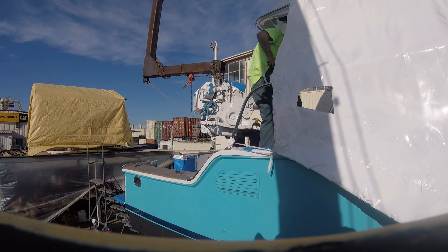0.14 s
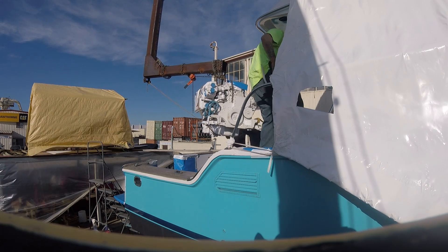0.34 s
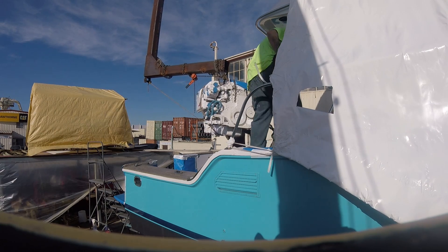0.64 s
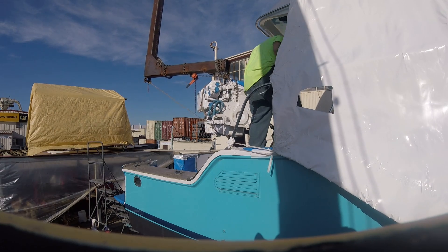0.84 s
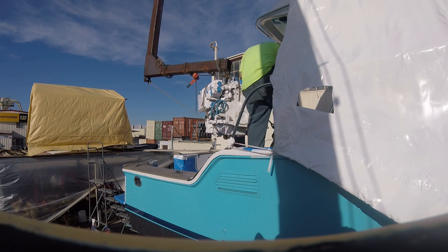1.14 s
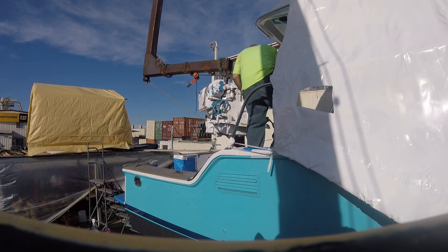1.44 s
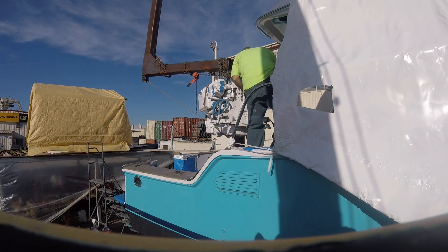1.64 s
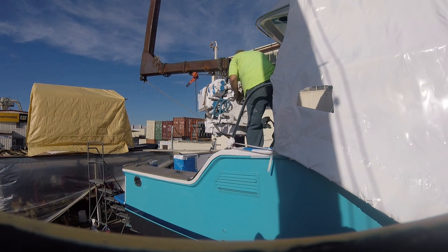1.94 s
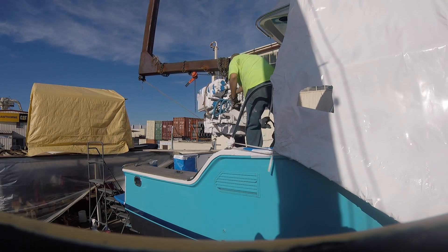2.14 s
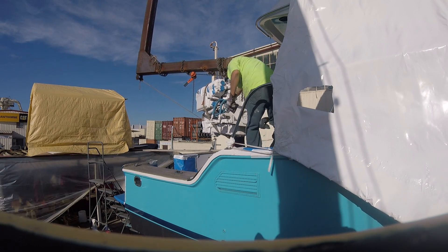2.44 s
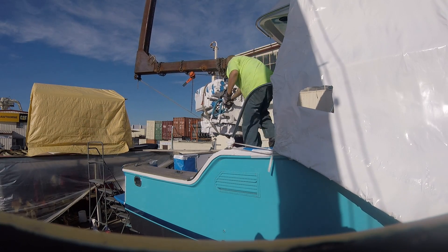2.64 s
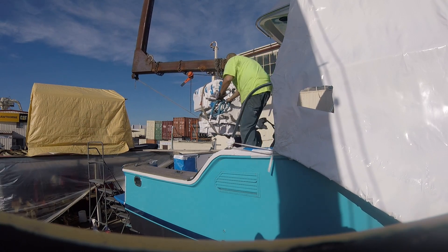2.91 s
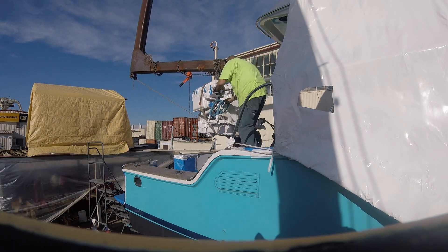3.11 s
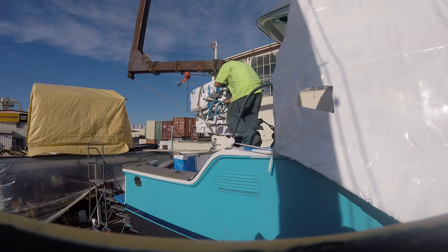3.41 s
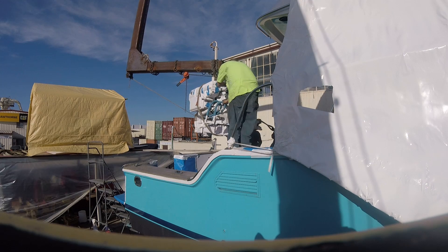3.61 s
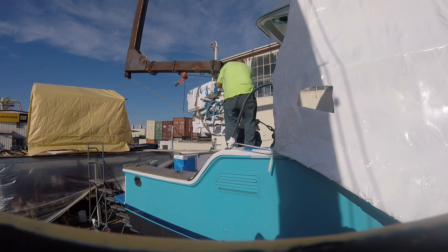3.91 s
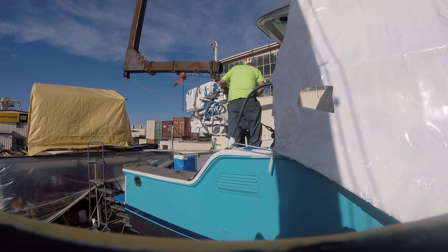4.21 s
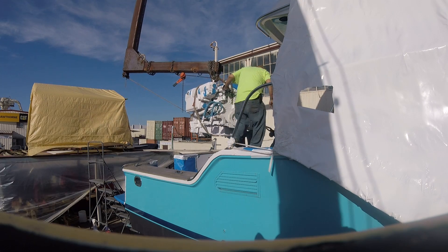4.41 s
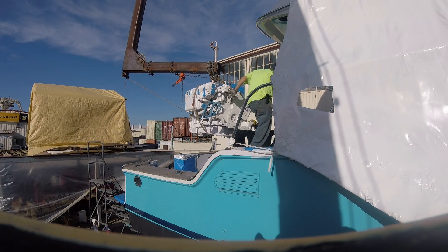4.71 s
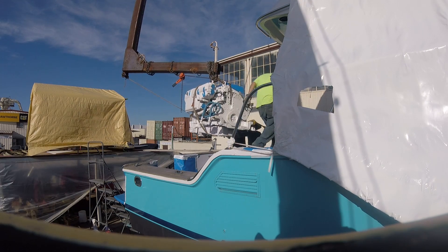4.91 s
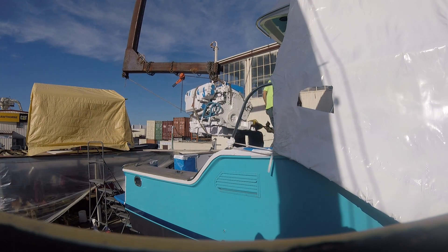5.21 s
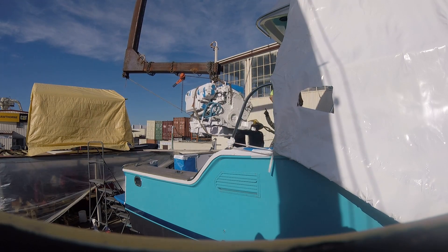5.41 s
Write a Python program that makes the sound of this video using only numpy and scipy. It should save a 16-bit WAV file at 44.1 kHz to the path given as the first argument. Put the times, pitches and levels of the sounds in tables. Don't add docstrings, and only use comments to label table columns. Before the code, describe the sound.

A diesel engine idles with a deep steady rumble in a windy boatyard; metal squeaks, then a hydraulic hiss with ringing pipes begins halfway.

```python
import sys
import numpy as np
from scipy import signal
from scipy.fft import rfft, irfft
from scipy.io import wavfile
from scipy.ndimage import uniform_filter1d

SR = 44100
rng = np.random.default_rng(int(sys.argv[2]) if len(sys.argv) > 2 else 0)


def volts(x):
    e = np.asarray(x, float) / 20
    return 10 ** e


def wrap_up_sound(samples):
    columns = np.atleast_2d(samples).T
    tamed = np.clip(columns, -1, 1)
    steps = np.round(tamed * 32767).astype(np.int16)
    wavfile.write(sys.argv[1], SR, steps)


N = 244755


def read(points, hz):
    f, value = np.transpose(points)
    return np.interp(np.log(hz + 1), np.log(f + 1), value)


def curves(rows):
    s, *columns = np.transpose(rows)
    return [np.interp(np.arange(N) / SR, s, c) for c in columns]


def evened(x):
    return x / np.sqrt(np.mean(x ** 2) + 1e-20)


def steadied(x, seconds):
    width = round(seconds * SR)
    power = uniform_filter1d(uniform_filter1d(x ** 2, width), width)
    return x / np.sqrt(power + 1e-9)


def drift(rate_hz):
    spectrum = rfft(rng.standard_normal(N))
    lowpass = np.exp(-(np.fft.rfftfreq(N, 1 / SR) / rate_hz) ** 2)
    return evened(irfft(spectrum * lowpass, N))


def noise(points, patchy_db):
    hz = np.fft.rfftfreq(2048, 1 / SR)
    real, imaginary, patches = rng.standard_normal((N // 512 + 5, 1025, 3)).T
    patches = uniform_filter1d(patches, size=16, axis=0)
    patches = evened(uniform_filter1d(patches, size=6, axis=1))
    level = volts(read(points, hz)[:, None] + patchy_db * patches)
    spectrum = (real + 1j * imaginary) * level
    return evened(signal.istft(spectrum, nperseg=2048, noverlap=1536)[1][:N])


def resonate(x, hz, width):
    turn = np.exp(2j * np.pi * np.cumsum(hz * np.ones(len(x))) / SR)
    r = np.exp(-np.pi * width / SR)
    return 2 * (turn * signal.lfilter([1 - r], [1, -r], x / turn)).real


def bursts(rows, sharpness):
    out, t = np.zeros(N + SR), np.arange(4000) / SR
    for s, db, hz, length in rows:
        shape = (t / length * 2.35 * np.exp(1 - t / length * 3.96)) ** 2
        width = hz / sharpness
        ringing = resonate(resonate(rng.standard_normal(len(t)), hz, width), hz, width)
        body = shape * ringing
        out[round(s * SR):][:len(t)] += volts(db) * body / abs(body).max()
    return out[:N]


def swell_power(s, length, db):
    return volts(db) ** 2 * np.exp(-8 * ((np.arange(N) / SR - s) / length) ** 2)


def far_motor():
    # t/s, level/dB
    whine = [(0, -44), (.6, -44), (1.2, -55.5), (2.6, -53), (5.55, -72)]
    tone = resonate(resonate(rng.standard_normal(N), 668, 8), 668, 8)
    return volts(curves(whine)[0]) * evened(tone)


def scrapes():
    # t/s, peak level/dB, f/Hz, length/s
    ticks = [
        (.505, -46, 5400, .012),
        (.54, -48, 5400, .012),
        (.83, -50, 7500, .008),
        (.905, -49, 5400, .008),
    ]
    return bursts(ticks, 5.0)


def squeaks():
    # t/s, peak level/dB, f/Hz, length/s
    slips = [
        (0.055, -26, 1450, 0.033),
        (2.395, -33, 1700, 0.086),
        (2.426, -26.5, 1580, 0.043),
        (2.5486, -26.5, 1350, 0.04),
        (2.5994, -29, 1270, 0.026),
    ]
    return bursts(slips, 7.4)


def hum():
    # t/s, upper f/Hz, lower f/Hz
    panel_hz = [(0, 313, 294.3), (.5, 317, 292), (1, 314.2, 296.3), (2, 315, 294), (5.55, 316, 283.9)]
    # middle t/s, length/s, peak level/dB
    upper_swells = [(.42, 0.37, -27.5), (1.05, 0.68, -25.5), (1.75, .2, -23), (2.56, 0.17, -27),
                    (2.86, 0.23, -23), (3.1, 0.17, -26.5), (3.38, 0.46, -28), (3.95, .15, -30),
                    (4.3, .1, -28), (4.7, 0.17, -31.5), (5.1, 0.2, -30), (5.32, 0.51, -27)]
    # middle t/s, length/s, peak level/dB
    lower_swells = [(.18, 0.42, -21), (.55, 0.45, -27), (1.1, 0.19, -31), (1.72, 0.16, -23),
                    (2.04, 0.14, -25.5), (2.72, 0.3, -25.5), (3.18, 0.18, -21.5), (3.39, 0.18, -24),
                    (4.05, .08, -30), (4.65, 0.2, -35), (5.07, 0.16, -24.5), (5.27, 0.15, -29)]
    upper_rest_db, lower_rest_db = -36.5, -38.5
    upper_hz, lower_hz = curves(panel_hz)
    upper_level = np.sqrt(volts(upper_rest_db) ** 2 + sum(swell_power(*row) for row in upper_swells))
    lower_level = np.sqrt(volts(lower_rest_db) ** 2 + sum(swell_power(*row) for row in lower_swells))
    upper = np.sqrt(2) * np.cos(2 * np.pi * np.cumsum(upper_hz + 1.37 * drift(4)) / SR)
    lower = evened(resonate(resonate(rng.standard_normal(N), lower_hz, 21), lower_hz, 14))
    return volts(0.3) * upper_level * upper + volts(-2.0) * lower_level * lower


def wind_db(hz, light_db, slope):
    # t/s, strength level/dB
    breeze = [(0, 6.5), (.25, -6), (1.3, -1), (1.6, 3), (2.05, -2), (2.6, -3.5), (3.0, 7), (3.42, 6.5),
              (3.48, -1.5), (3.7, 1), (3.9, 5.5), (4.25, 9.5), (4.35, 3), (5.05, 0), (5.35, 6), (5.55, 1.5)]
    # middle t/s, length/s, peak level/dB, eddy f/Hz
    gusts = [(0.093, 0.084, -18, 120), (0.892, 0.027, -24, 110), (1.144, 0.058, -23, 180),
             (1.199, 0.033, -19, 85), (1.403, 0.063, -21, 180), (1.45, 0.074, -11, 50),
             (1.566, 0.067, -14, 60.2), (2.217, 0.073, -12.5, 70.4), (2.397, 0.13, -18, 65),
             (2.787, 0.18, -19, 99.7), (3.035, 0.077, -18.5, 80), (3.12, 0.052, -14, 110),
             (3.242, 0.077, -13.5, 126), (3.409, 0.04, -5.5, 86), (3.737, 0.055, -15.5, 105),
             (3.854, 0.025, -7, 100), (3.954, 0.038, -17.5, 85), (3.99, .06, -16, 45),
             (4.059, 0.067, -11.5, 130), (4.16, 0.071, -17, 130), (4.218, 0.039, -10, 98),
             (4.565, 0.18, -20.5, 94), (4.934, 0.072, -15, 112), (5.213, 0.05, -16, 115),
             (5.31, .06, -26, 40.32), (5.37, 0.11, -22, 180), (5.508, .12, -23, 59.9)]
    spread_db = 7
    power = volts(light_db + slope * curves(breeze)[0]) ** 2
    for s, length, db, eddy_hz in gusts:
        octaves = np.log2(hz / eddy_hz)
        power = power + swell_power(s, length, db - spread_db * octaves ** 2)
    return 10 * np.log10(power)


def wind():
    # centre f/Hz, light-breeze level/dB, gain/(dB per dB of strength)
    wind_bands = [(34.6, -31.5, 0.5), (93, -24.5, 0.72), (180, -25, 0.72), (385, -29.5, 0.35)]
    calm_db = [-26, -24, -24, -26]
    # f/Hz, level/dB
    spectra = [[(10, -35.5), (25, 13.5), (45, 12.5), (60, -3.5), (90, -30.0), (400, -110)],
               [(35, -26.5), (70, -2.5), (110, -4.5), (150, -10.5), (220, -39), (700, -110)],
               [(70, -26.0), (130, 2), (180, 4.5), (280, -4.0), (400, -23.0), (1500, -110)],
               [(220, -26.5), (340, 1.5), (600, -8.5), (900, -19.5), (2500, -110)]]
    chop = volts(2.55 * drift(35))
    total = np.zeros(N)
    for band, calm, spectrum in zip(wind_bands, calm_db, spectra):
        db = wind_db(*band)
        db = db - 1.17 * np.maximum(calm - db, 0)
        total += volts(db) * steadied(chop * noise(spectrum, patchy_db=1.4), 0.045)
    return total


def puffs():
    # t/s, peak level/dB, f/Hz, length/s
    buffets = [(1.09, -10, 326, 0.06), (1.1, -32, 410, 0.045), (1.13, -12, 231, 0.055),
               (1.48, -18.5, 313, 0.031), (3.41, -11, 208, 0.019), (3.838, -10.5, 360, 0.012),
               (3.84, -22, 600, 0.032), (4.003, -13.5, 585, 0.015), (4.005, -13.5, 335, 0.041),
               (4.16, -13.5, 348, 0.036), (4.235, -16.5, 594, 0.015)]
    return bursts(buffets, 4.0)


def hydraulics():
    # f/Hz, level/(dB per Hz)
    hiss_spectrum = [(600, -37), (1100, -28.5), (1400, -6), (2000, -13.5), (3300, -17), (4400, -17),
                     (4800, -12.5), (6300, -13.5), (7200, -26.5), (9300, -31), (10900, -31), (12000, -49),
                     (13200, -39.5), (15000, -62.5)]
    # f/Hz, width/Hz, rms level/dB
    pipes = [(1165, 12, -50), (1210, 16, -45), (1234, 12, -42), (1258, 10, -47), (1298, 10, -42),
             (1406, 12, -41), (1465, 12, -40), (1507, 11, -44), (1543, 10, -44), (1598, 11, -47),
             (1669, 14, -46), (1690, 14, -48), (1847, 12, -47), (2172, 20, -53), (2212, 22, -51),
             (2589, 28, -55), (2795, 75, -46), (2952, 20, -52), (3220, 30, -58), (3484, 40, -58),
             (4167, 60, -56), (4657, 25, -57), (4801, 30, -56), (5046, 36, -47), (5181, 25, -57),
             (5630, 35, -54), (5870, 60, -54), (6069, 25, -56), (7565, 40, -67), (9250, 50, -73)]
    # t/s, level/dB
    load = [(2.65, -7), (2.78, 0), (3.06, -1), (3.55, -2), (4.15, -1.7), (4.4, -5), (4.7, -4), (4.8, 0),
            (5.55, -2.5)]
    valve_s, valve_rise_s = 2.651, 0.0058
    hiss_db, pipes_db = -33, 3.5
    since = np.maximum(np.arange(N) / SR - valve_s, 0)
    opening = 1 - np.exp(-since / valve_rise_s)
    load_db = curves(load)[0]
    flow = rng.standard_normal(N) * volts(0.61 * drift(30))
    rings = np.zeros(N)
    for k, (hz, width, db) in enumerate(pipes):
        sign = (-1) ** k
        mode = steadied(resonate(resonate(flow, hz, width), hz, 1.5 * width), 0.14)
        rings += sign * volts(pipes_db + db + load_db * (hz < 2000)) * mode
    surge_db = 1.5 * np.exp(-since / 0.24)
    hiss = volts(hiss_db + surge_db + 0.64 * drift(49)) * noise(hiss_spectrum, patchy_db=0.0)
    return opening * (rings + hiss)


def engine():
    # t/s, firing f/Hz
    firing = [
        (0, 63.45),
        (.8, 63.6),
        (1.15, 64.25),
        (1.6, 64.0),
        (3, 64.05),
        (4.2, 64.17),
        (5.55, 64.2),
    ]
    # multiple of the six-firing cycle, rms level/dB
    order_lines = [(2, -41.5), (4, -42), (5, -33), (6, -20), (9, -31.5), (12, -17), (14, -33), (15, -34),
                   (18, -39), (26, -36)]
    # f/Hz, level/(dB per Hz)
    roar_spectrum = [(12, -41.5), (35, -3.5), (160, -2.5), (330, -9), (400, -15.5), (800, -16),
                     (1900, -26.5), (2100, -30), (3700, -40), (4250, -48), (4800, -43.5), (6200, -43.5),
                     (7150, -55.5), (11000, -63.5), (14000, -76)]
    roar_db, firing_lean = -23, 2.1
    cycle = 2 * np.pi * np.cumsum(curves(firing)[0]) / SR / 6
    lines = np.zeros(N)
    for order, db in order_lines:
        phase = 2 * np.pi * rng.random() if order % 3 else firing_lean
        lines += volts(db + 0.55 * drift(1.3)) * np.sqrt(2) * np.cos(order * cycle + phase)
    throb = 1 + 0.038 * np.cos(cycle) + 0.04 * np.cos(2 * cycle) + 0.04 * np.cos(6 * cycle)
    return lines + volts(roar_db) * noise(roar_spectrum, patchy_db=1.0) * throb


def gain_control():
    # t/s, depth level/dB
    ducks = [
        (3.22, 3),
        (3.42, 3),
        (3.86, 1),
        (4.1, 1.6),
        (4.58, -0.1),
    ]
    fall_s, recover_s, open_gain_db = 0.054, 0.48, 0.05
    start, depth_db = np.array(ducks)[:, :1], np.array(ducks)[:, 1:]
    since = np.maximum(np.arange(N) / SR - start, 0)
    dips = depth_db * (1 - np.exp(-since / fall_s)) * np.exp(-since / recover_s)
    return volts(open_gain_db - dips.sum(axis=0))


def scene():
    yard = far_motor() + scrapes() + squeaks() + hydraulics() + engine()
    return (gain_control() * yard + hum() + wind() + puffs())[None]


def low_pass(x):
    return signal.sosfilt(signal.butter(12, 15140, fs=SR, output="sos"), x)


def record(dry):
    limited = dry / (1 + (abs(dry) / .95) ** 4) ** .25
    fade_in_s = .004
    limited = limited * np.minimum(np.arange(N) / SR / fade_in_s + .15, 1)
    return low_pass(limited)


dry = scene()
out = record(dry)
wrap_up_sound(out)
```